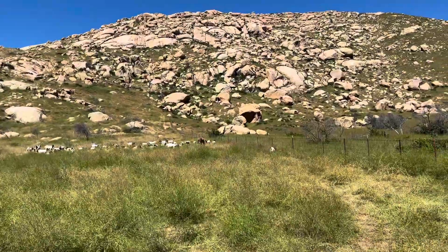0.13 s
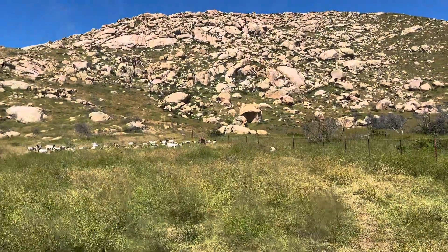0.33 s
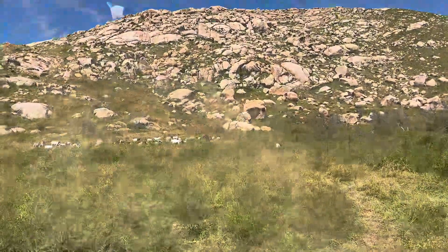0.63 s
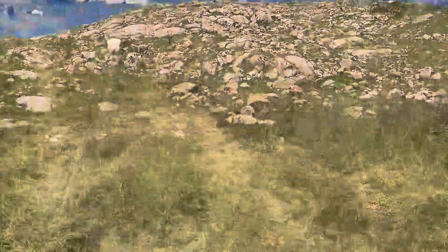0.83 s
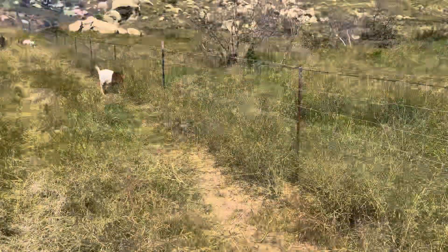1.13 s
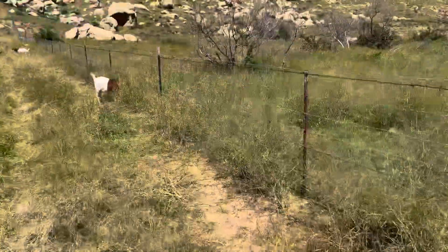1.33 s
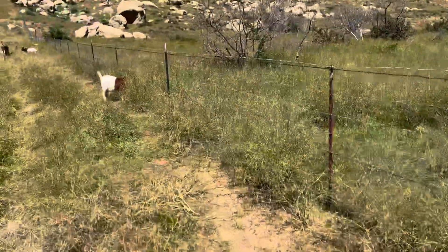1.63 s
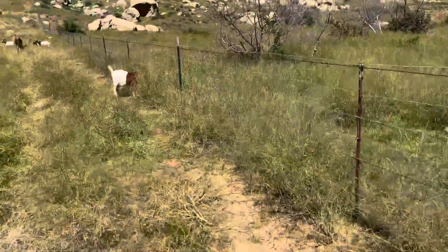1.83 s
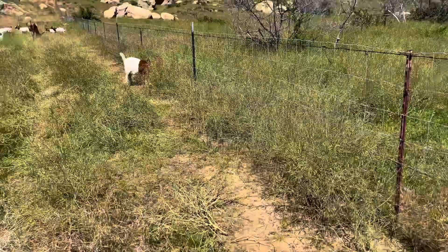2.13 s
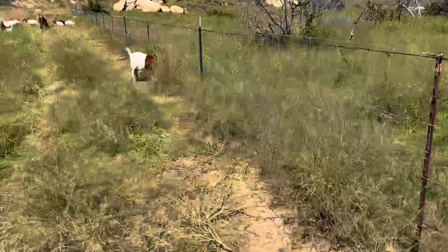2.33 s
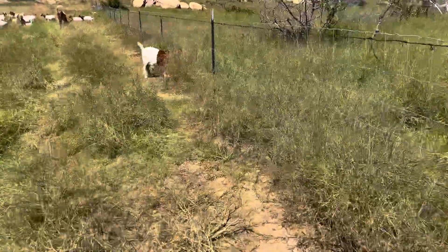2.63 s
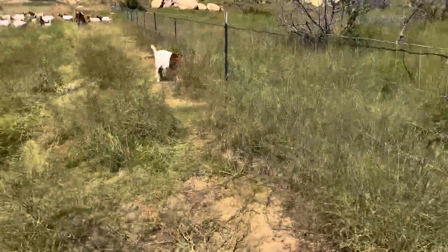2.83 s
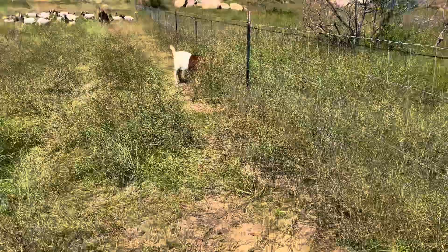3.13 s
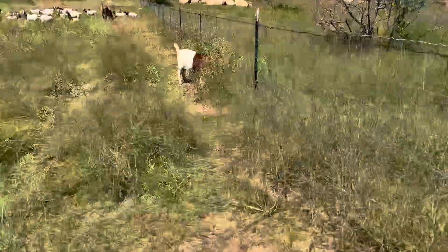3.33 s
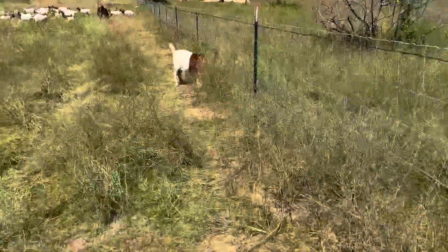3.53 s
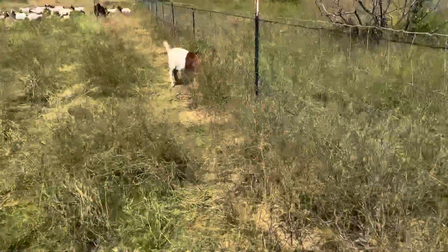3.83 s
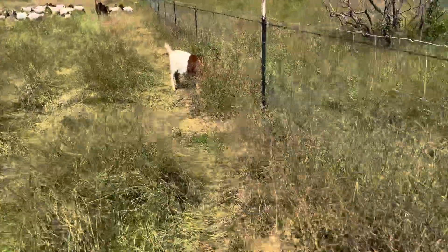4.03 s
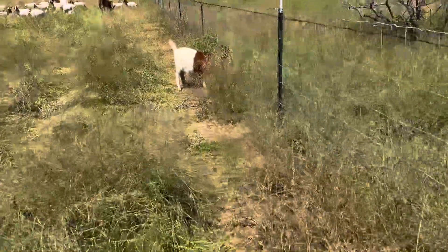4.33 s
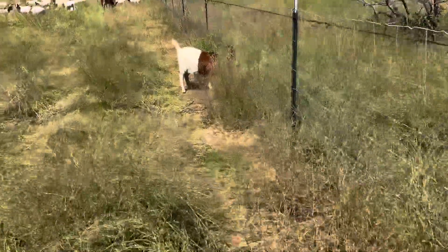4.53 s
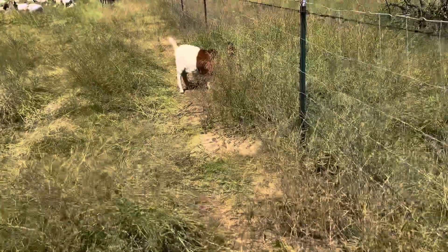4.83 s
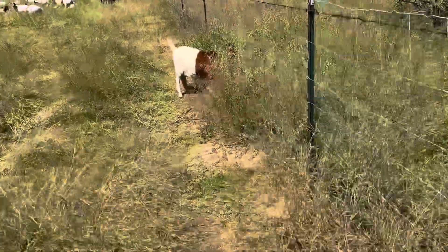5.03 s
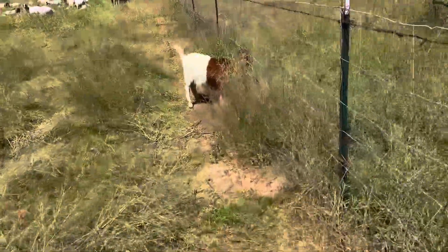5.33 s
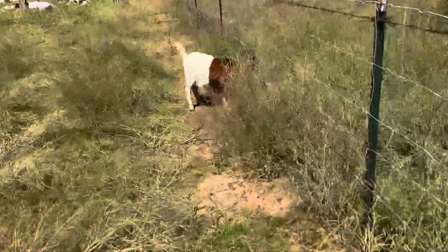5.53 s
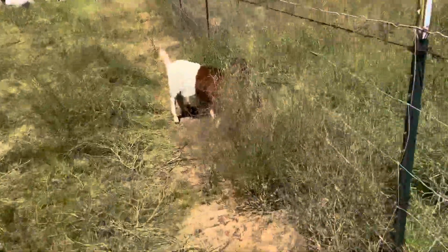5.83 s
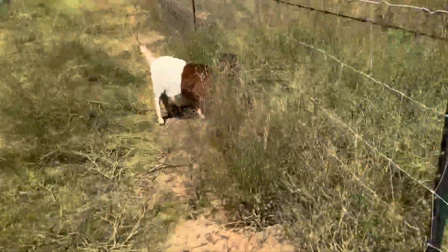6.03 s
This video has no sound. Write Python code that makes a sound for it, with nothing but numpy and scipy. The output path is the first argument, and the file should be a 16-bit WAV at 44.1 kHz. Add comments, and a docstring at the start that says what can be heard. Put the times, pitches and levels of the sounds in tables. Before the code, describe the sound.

A young goat gives one quavering bleat in gusty wind, followed by light steps rustling through dry grass.

```python
"""Wind buffets the two microphone ports of a hand-held camera, and a young goat bleats once across the pasture;
from about 1.2 s someone walks through dry grass, over a faint steady hiss. The bleat is a throbbing train of
vocal-fold pulses, filtered by the resonances of throat and mouth. Each stride scrapes the stalks and snaps a
few, and twigs crunch underfoot near the end. Turbulent pressure at the ports makes the rumble, flutter and
thuds of the wind."""
import sys
import numpy as np
from scipy import signal
from scipy.fft import rfft, irfft
from scipy.io import wavfile
from scipy.ndimage import uniform_filter1d, map_coordinates

SR = 44100
rng = np.random.default_rng(int(sys.argv[2]) if len(sys.argv) > 2 else 0)


def wav_record(signal):
    """Record a signal, one row per channel, as 16-bit PCM in the file named by sys.argv[1]."""
    frames = np.transpose(np.atleast_2d(signal))
    bounded = np.clip(frames, -1, 1)
    # unit amplitude maps onto the largest positive 16-bit level
    quanta = np.round(bounded * 32767).astype(np.int16)
    wavfile.write(sys.argv[1], SR, quanta)


N = 272449
T, HZ = np.arange(N) / SR, np.fft.rfftfreq(N, 1 / SR)

# Phase lead of the bleat at the left port (frequency [Hz], phase [rad])
GOAT_LEAD = [(400, 0), (1900, 2.2), (2760, 6.2), (4800, 7.3), (6000, 6.2), (8900, 6.1), (11600, 0)]
def goat():
    """Source-filter principle: the folds drive the vocal tract, and the call reflects off the land."""
    t = T[:round(1.3 * SR)]
    pulses, effort_db = vocal_folds(t)
    call = np.zeros(N)
    add(call, 0, 2.7 * vocal_tract(t, pulses, effort_db) * gain_of(uniform_filter1d(effort_db, 200)))
    left_db = [(1300, .83), (2400, 4.9), (4400, 5.7), (8000, 4.8), (15000, .5)]
    return ports(reflections(call), GOAT_LEAD, left_db)


# Throbs of the bleat (trough time [s], trough pitch [Hz], trough effort [dB],
# crest time [s], crest pitch [Hz], crest effort [dB], rebound pitch [Hz])
THROBS = [(.323, 408, -64, .35, 409, -55, 388), (.38, 385, -59, .434, 408, -46, 387),
          (.46, 386, -54, .512, 412, -40, 392), (.54, 390, -47, .594, 413, -38, 394),
          (.624, 391, -48, .682, 410, -34, 394), (.708, 391, -43, .76, 410, -33.5, 396),
          (.79, 392, -47, .846, 407, -34, 392), (.872, 392, -44, .932, 410, -32, 398),
          (.968, 386, -46, 1.016, 407, -30.5, 400), (1.058, 376, -53, 1.106, 409, -31.5, 398),
          (1.147, 370, -53, 1.192, 391, -43, 366)]
END_S, END_HZ, END_DB, BREAK_HZ = 1.225, 365, -64, 392
def vocal_folds(t):
    """Glottal pulses: pitch and effort climb in each throb, break, and sag into the next."""
    low_s, low_hz, low_db, crest_s, crest_hz, crest_db, rebound_hz = np.transpose(THROBS)
    # after each crest the folds lose tension: a quick dip, then a short rebound
    times = np.ravel([low_s, crest_s - .018, crest_s, crest_s + .012, crest_s + .022], "F")
    pitches = np.ravel([low_hz, crest_hz - 2, crest_hz, np.minimum(BREAK_HZ, rebound_hz), rebound_hz], "F")
    hz = np.interp(t, [*times, END_S], [*pitches, END_HZ])
    times = np.ravel([low_s, crest_s - .022, crest_s + .009], "F")
    efforts = np.ravel([low_db, crest_db - 1, crest_db], "F")
    effort_db = np.interp(t, [*times, END_S], [*efforts, END_DB], left=-120, right=-120)
    jitter = 1 + .005 * wobble(200)[:len(t)]
    cycles = np.cumsum(uniform_filter1d(hz, 170) * jitter) / SR
    tone = unit_rms(sum(np.cos(2 * np.pi * k * cycles) / (1 + (k / 15) ** 3) for k in range(1, 32)))
    breath = unit_rms((.9 + np.exp(-(cycles % 1) / .096)) * rng.standard_normal(len(t)))
    rough = .2 + .4 * sum(np.exp(-((t - s - .016) / .007) ** 2) for s in crest_s)
    return (1 - rough) * tone + rough * breath, effort_db


# Formant groups (frequency before shifting [Hz], bandwidth [Hz], relative gain [dB])
MAIN = [(2890, 1400, -6), (3230, 580, 4.5), (10530, 510, -7)]
LOW = [(1560, 250, -10), (2034, 420, 4.5)]
TOP = [(6430, 760, 1.5), (7080, 1180, 6), (8270, 2300, 2.5)]
# Upper formants (offset from their gliding base [Hz], bandwidth [Hz], relative gain [dB])
UPPER = [(60, 1080, 8.4), (675, 930, 1.1)]
# Vowel colour against the main group (time [s], low [dB], upper [dB], top [dB])
VOWEL = [(.345, 1.5, -9, -10.5), (.507, 5, -6, -9), (.6, -10, -7, -6), (.675, -17, -15.5, -18),
         (.76, -11, -16, -18), (.84, -7.5, -11.5, -16), (.92, -7, -10.5, -15), (1.01, -14, -7, -7),
         (1.1, -10, -7.5, -4.5), (1.2, -24, -2, 0.5)]
def vocal_tract(t, pulses, effort_db):
    """Formant filtering: gliding resonances of throat and mouth shape the vowel."""
    vowel_s, *vowel_db = np.transpose(VOWEL)
    dip_db = uniform_filter1d(np.maximum(effort_db, END_DB), round(.09 * SR)) - effort_db
    # the upper and top groups smooth over a share of the throbbing
    low, upper, top = (gain_of(np.interp(t, vowel_s, db) + share * np.minimum(dip_db, 12))
                       for db, share in zip(vowel_db, [0, .41, .58]))
    groups = [(MAIN, 1, -2800 * np.maximum(t - 1.084, 0)),  # sinks as the call dies
              (LOW, low, 0),
              (UPPER, upper, 4430 - 940 * (t - THROBS[0][3])),  # sinks as the mouth opens
              (TOP, top, -730 * (t - .9))]
    return sum(gain * gain_of(db) * resonate(pulses, hz + shift_hz, width)
               for formants, gain, shift_hz in groups for hz, width, db in formants)


# Lag of the ground echo as the head moves (time [s], delay [ms])
GROUND_ECHO = [(.35, .4), (.5, .42), (.6, .428), (.76, .41), (.9, .424), (1.0, .44), (1.12, .447),
               (1.2, .47)]
def reflections(call):
    """Comb filtering by a dull ground echo; scattering by grass and rocky slope adds a short tail."""
    delay = np.interp(T, *np.transpose(GROUND_ECHO)) * SR / 1000
    call = call + gain_of(-4) * map_coordinates(uniform_filter1d(call, size=4), [np.arange(N) - delay])
    tail = rng.standard_normal((2, 6000)) * gain_of(-60 * T[:6000] / .08)
    tail /= np.linalg.norm(tail[0])
    return call + gain_of(-11) * signal.oaconvolve(call[None], tail, axes=1)[:, :N]


# Legs sweeping the grass (entry time [s], exit time [s], entry swish [dB], exit swish [dB],
# rustle against swish [dB])
STRIDES = [(1.23, 1.392, -54, -45.5, -5.5), (1.433, 1.53, -62, -66, -4), (1.724, 1.759, -62.5, -54.5, -5),
           (1.89, 2.117, -45.5, -58.5, -16.5), (2.18, 2.337, -63, -67.5, 4),
           (2.434, 2.719, -45, -52.5, -5.5), (2.983, 3.452, -49, -60, -5), (3.616, 3.854, -44, -52, -8),
           (4.169, 4.437, -44, -56.5, -12), (4.583, 5.024, -54, -72, -6), (5.351, 5.578, -50.5, -53, -8.5),
           (5.76, 5.796, -53, -59, -3), (5.86, 6.033, -53.5, -53, -1), (6.08, 6.183, -62, -71.5, 4)]
RISE_DB_PER_S, DROP_DB, DROP_S, SETTLE_DB_PER_S = 172, 9, .014, 116
def stride_powers():
    """Incoherent sources add in power: each leg pushes in, drags, pulls out, and the stalks settle."""
    swish, rustle = np.zeros((2, N))
    for enter, leave, enter_db, leave_db, rustle_db in STRIDES:
        before, after = np.maximum(enter - T, 0), np.maximum(T - leave, 0)
        db = np.interp(T, [enter, leave], [enter_db, leave_db]) - RISE_DB_PER_S * before
        db -= DROP_DB * np.minimum(after / DROP_S, 1) + SETTLE_DB_PER_S * after
        peak_db = max(enter_db, leave_db)
        swish += gain_of(db) ** 2
        rustle += gain_of(peak_db + rustle_db + .61 * (db - peak_db)) ** 2
    return swish, rustle


# Spectra of fine and coarse scrapes (frequency [Hz], relative level [dB])
SWISH = [(2500, -13), (5500, -9), (7500, -5.5), (9000, 1), (10300, 2), (11500, -2), (12700, -14),
         (13600, -27), (15500, -21)]
RUSTLE = [(300, -22), (900, 5), (1700, 2.5), (2900, 0), (4300, -9), (6000, -6.5), (9000, -3), (13000, -62)]
# Likeness of the two ports (frequency [Hz], correlation [0-1])
GRASS_CORRELATION = [(800, 1), (2000, 0.59), (4000, 0.31), (8000, 0.8), (15000, 1)]
# Phase lead of the left port (frequency [Hz], phase [rad])
GRASS_LEAD = [(300, 0), (1900, 1.1), (6600, .5), (7750, 1.1), (8870, -.4), (11700, -6), (14600, -12.6)]
# Left port against right (frequency [Hz], level difference [dB])
GRASS_LEFT = [(700, 16.5), (1300, 9), (2400, 5), (4400, 8), (8100, 3), (15000, -2.5)]
def grass():
    """Friction noise: thousands of tiny, uneven stalk scrapes follow the legs, with a few snaps."""
    swish, rustle = stride_powers()
    out = np.zeros((2, N))
    for spectrum, power, db, per_s, spread_db, patch_db in [(SWISH, swish, 4.5, 9000, 3.5, 1.5),
                                                            (RUSTLE, rustle, 4, 5000, 3, 3.5)]:
        scrapes = (impulses(per_s, spread_db, cap=6) + .6) * rng.standard_normal((2, N))
        envelope = np.sqrt(power) * gain_of(db + 1.6 * wobble(74))
        out += envelope * patchy(coloured(pair(scrapes, GRASS_CORRELATION), spectrum), patch_db)
    return ports(out + snaps(), GRASS_LEAD, GRASS_LEFT)


# Breaking stalks (time [s], relative peak level [dB], frequency [Hz])
SNAPS = [(0.201, -49, 8900), (0.967, -27, 9000), (0.981, -35, 10000), (1.52, -37.5, 6640),
         (1.688, -40, 1800), (1.85, -42, 11100), (1.856, -29, 9200), (2.0785, -28, 9600),
         (2.385, -39, 1300), (2.419, -34, 8960), (2.439, -35, 8060), (2.6268, -36, 1120),
         (2.6675, -27, 11600), (2.673, -29, 8700), (2.712, -22, 10500), (2.937, -44, 1690),
         (3.125, -22, 9600), (3.132, -48, 4000), (3.3083, -39, 1170), (3.497, -41, 3230),
         (3.7336, -22, 9000), (3.842, -31, 7700), (4.069, -29, 9100), (4.0995, -28, 8800),
         (4.195, -44, 8900), (4.864, -35, 8350), (4.9425, -46, 8750), (4.9687, -44, 9300),
         (5.084, -54, 2000), (5.2525, -45, 9400), (5.265, -46, 2780), (5.2913, -42, 1090),
         (5.7357, -46, 2800), (5.8245, -43, 1300), (6.059, -42, 4200)]
def snaps():
    """Brittle fracture: a stalk gives a heavily damped ring and a tick of noise."""
    out, t = np.zeros(N), T[:200]
    for s, db, hz in SNAPS:
        ring = np.sin(2 * np.pi * hz * t) * t * hz * np.exp(-t * hz / .8)
        snap = ring + .15 * rng.standard_normal(len(t)) * np.exp(-t / .0008)
        add(out, s, gain_of(db + 2.5) * snap / abs(snap).max())
    return out


# Twigs crushed underfoot (time [s], duration [s], level before filtering [dB])
CRUNCHES = [(5.774, 0.0048, -38.5), (5.987, 0.0124, -42), (6.02, 0.014, -41)]
# Spectrum of a crack (frequency [Hz], relative level [dB])
TWIG = [(500, -9), (1200, -2.5), (2800, 2.5), (4200, -10.5), (9000, -29)]
def twigs():
    """Repeated fracture: each crunch is a clump of broadband cracks."""
    cracks = np.zeros(N)
    for s, duration, db in CRUNCHES:
        noise, chance = rng.standard_normal((2, 1200))
        clumps = uniform_filter1d(chance, size=30) ** 2
        add(cracks, s, gain_of(db) * unit_rms((noise * clumps)[:round(duration * SR)]))
    cracks = irfft(rfft(cracks) * gain_of(6 + curve(TWIG)), N)
    return ports(cracks[None], GRASS_LEAD, [(1000, 4.5), (9000, 1.5)])


# Wind strength (time [s], relative rumble level [dB], flutter against rumble [dB])
WIND = [(0.0, -17, -8), (0.05, -24, -4.5), (0.09, -14.5, -5), (0.19, -21, 1.5), (0.34, -29.5, -12.5),
        (0.38, -23.5, -9.5), (0.6, -24, -6), (0.92, -26, -6), (1.02, -22, -6), (1.055, -32, -8),
        (1.1, -28.5, 0.5), (1.2, -25, -3), (1.24, -22, -8.5), (1.32, -31.5, -10.5), (1.47, -40.5, -12.5),
        (1.53, -28, -5.5), (1.76, -33, -10), (1.96, -28, -12.5), (2.01, -35.5, -7), (2.05, -27, -18),
        (2.17, -45.5, -11), (2.27, -27, -11), (2.67, -47.5, -11.5), (2.72, -33.5, -13),
        (3.18, -29.5, -13.5), (3.35, -47.5, -8.5), (3.54, -25, -9), (3.66, -28.5, 0), (3.68, -19, -8.5),
        (3.9, -26.5, -17.5), (3.96, -36.5, -11.5), (4.25, -23.5, -3.5), (4.65, -33.5, -9.5),
        (4.731, -21.5, -7), (4.84, -28, -8), (5.02, -40, -20.5), (5.15, -59, -17), (5.21, -27, -9),
        (5.26, -33.5, -23.5), (5.33, -47.5, -1), (5.42, -25, -8), (5.51, -41, -28), (5.54, -59, -5),
        (5.59, -30.5, -15), (5.67, -39, -10), (5.71, -27, -12), (5.76, -37, -12), (5.9, -42, -12),
        (5.94, -36, -15), (6.01, -54, -10), (6.07, -36, -15), (6.12, -52, -14), (6.15, -43, -18),
        (6.18, -64, -7)]
# Rasp of the strong early gusts (time [s], relative level [dB])
RASP_LEVEL = [(0.0, -19), (0.012, -19), (0.045, -32), (0.075, -25), (0.15, -20), (0.165, -33), (0.23, -49),
              (0.378, -41), (0.39, -57), (0.452, -28.5), (0.488, -54), (0.544, -19), (0.626, -32.5),
              (1.122, -35.5), (1.186, -24.5), (1.206, -48), (1.45, -72)]
# Spectra of the three wind bands (frequency [Hz], relative level [dB])
RUMBLE = [(28, -43), (55, 5.5), (100, 3), (200, -3.5), (300, -13), (600, -84)]
FLUTTER = [(120, -37), (250, 0), (400, -3), (800, -12.5), (1300, -36.5), (3000, -94)]
RASP = [(500, -0.5), (1000, 1.5), (2000, -13), (4000, -35), (8000, -62), (11000, -98)]
def wind():
    """Turbulent pressure at the ports: lumpy rumble, bursts of flutter, and rasp in strong gusts."""
    s, rumble_db, flutter_db = np.transpose(WIND)
    rasp_db = np.interp(T, *np.transpose(RASP_LEVEL), right=-90)
    gust, burst = wobble(23), wobble(135)
    bands = [(RUMBLE, np.interp(T, s, rumble_db) + 1.3, 2.94 * gust + 1.72 * burst, .74),
             (FLUTTER, np.interp(T, s, rumble_db + flutter_db) - .5, 4.3 * (gust + burst), .64),
             (RASP, rasp_db, .63 * gust + 2.7 * burst, .3)]
    out = np.zeros((2, N))
    for spectrum, db, lumps_db, correlation in bands:
        noise = pair(rng.standard_normal((2, N)), [(20, correlation), (9000, correlation)])
        out += gain_of(db) * unit_rms(gain_of(lumps_db)) * coloured(noise, spectrum)
    return gain_of([[.4], [-.4]]) * out


# Eddies breaking on the ports (time [s], relative peak level [dB], nominal frequency [Hz],
# harsh edge against thud [dB])
EDDIES = [(0.093, -7, 370, -11), (0.117, -24.5, 420, 3), (0.135, -10.5, 320, -15), (0.158, -23, 495, -19),
          (0.183, -27, 430, -39), (0.324, -25, 480, -4), (0.373, -14.5, 415, -12), (0.454, -8, 440, -29),
          (0.546, -15, 408, -14), (0.623, -17, 450, -22), (0.759, -14, 550, -2), (0.802, -20.5, 426, -2),
          (0.887, -13, 473, -11), (0.984, -15, 520, -18), (1.012, -12, 462, -10.5), (1.08, -22, 371.4, -21),
          (1.13, -13.5, 591, -12), (1.152, -11.5, 599, -24), (1.176, -15, 720, -20), (1.186, -19, 609, -2),
          (1.248, -22, 425, -23), (1.51, -18.5, 504, -36), (1.642, -33, 423, -37), (1.674, -14.5, 352, -51),
          (1.826, -16, 341, -18.5), (1.943, -14.5, 387, -50), (1.969, -22, 554, -28),
          (2.256, -26, 370, -35), (2.845, -20, 322, -40), (2.894, -25, 343, -18), (3.032, -21, 332, -37),
          (3.447, -19.5, 329, -42), (3.686, -19.5, 318, -39), (3.708, -11, 513, -40),
          (3.726, -9.5, 424, -20), (3.746, -12, 376, -15), (3.812, -8.5, 346, -44),
          (3.875, -10.5, 584, -15), (3.942, -21, 340, -39), (4.005, -21.5, 370, -51),
          (4.134, -15.5, 354, -61), (4.215, -18, 445, -16), (4.232, -16, 400, -40), (4.252, -30, 504, 0),
          (4.314, -29, 552, -13), (4.326, -11.5, 595, -18), (4.344, -31, 507, -20), (4.372, -33, 480, -22),
          (4.474, -17, 374, -26), (4.709, -18.5, 510, -33), (4.741, -16, 368, -44),
          (4.779, -14.5, 350, -42), (4.83, -26.5, 393, -40), (4.893, -31.5, 580, -40),
          (5.162, -20.5, 359, -36), (5.199, -21.5, 430, -47), (5.598, -23, 407, -40), (5.7, -13, 370, -42)]
EDDY_DECAY_S, EDDY_GLIDE_S = .0031, .0094
def eddies():
    """Pressure transients: each passing eddy is a ragged, falling thud with a harsh edge."""
    out, t = np.zeros((2, N)), T[:2000]
    harsh = np.array([coloured(rng.standard_normal(N), RASP) for port in "LR"])
    envelope = t ** 2 * np.exp(-t / EDDY_DECAY_S)
    for s, db, hz, edge_db in EDDIES:
        common, *sides = rng.standard_normal((3, len(t)))
        glide = eddy_glide(hz, t)
        swing = np.sin(2 * np.pi * np.cumsum(glide) / SR + common[0])
        ragged = np.array([unit_rms(resonate(common + .85 * own, glide, .73 * hz)) for own in sides])
        thud = (swing + .5 * ragged) * envelope
        edge = harsh[:, round(s * SR):][:, :len(t)] * (envelope / envelope.max()) ** 3
        add(out, s - .005, gain_of(db - 3.5) * (thud / abs(thud[0]).max() + gain_of(edge_db + 1.5) * edge))
    return out


def eddy_glide(hz, t):
    """Exponential glide: the pressure swing slows as an eddy passes."""
    return hz * (.3 + 1.333 * np.exp(-t / EDDY_GLIDE_S))


def small_eddies():
    """Shot noise: a dense random run of small falling thuds follows the wind strength."""
    out, t = np.zeros((2, N)), T[:2500]
    envelope = t ** 2 * np.exp(-t / EDDY_DECAY_S)
    arrivals = impulses(per_s=45, spread_db=5, cap=4)
    kind = rng.integers(0, 12, N)
    for k, hz in enumerate(np.geomspace(230, 520, num=12)):
        common, *sides = rng.standard_normal((3, len(t)))
        ragged = np.array([resonate(common + .9 * own, eddy_glide(hz, t), .44 * hz) for own in sides])
        out += signal.oaconvolve((arrivals * (kind == k))[None], unit_rms(ragged * envelope), axes=1)[:, :N]
    s, rumble_db, flutter_db = np.transpose(WIND)
    return gain_of(np.interp(T, s, rumble_db + .63 * flutter_db) - 1.5) * unit_rms(out)


# Spectrum of the open pasture (frequency [Hz], relative level [dB])
PASTURE = [(300, -14), (1200, 18), (2200, 8), (3200, -1), (6000, -2), (8500, 1.5), (9700, 11), (10400, -27),
           (12000, -47)]
def pasture():
    """Ambient noise floor: a faint, nearly steady hiss."""
    hiss = coloured(pair(rng.standard_normal((2, N)), GRASS_CORRELATION), PASTURE)
    return gain_of(-66.5 + 1.2 * wobble(15)) * ports(hiss, GRASS_LEAD, [(100, .5), (9000, .5)])


def gain_of(db):
    """Decibels to amplitude ratio."""
    return 10 ** (np.asarray(db) / 20)


def unit_rms(x):
    """Normalisation to rms 1."""
    return x / np.sqrt(np.mean(x ** 2) + 1e-20)


def curve(points):
    """Interpolation of a table over log frequency."""
    hz, value = np.transpose(points)
    return np.interp(np.log(HZ + 1), np.log(hz + 1), value)


def coloured(x, spectrum):
    """Spectral shaping, at rms 1."""
    return unit_rms(irfft(rfft(x) * gain_of(curve(spectrum)), N))


def wobble(hz):
    """Low-pass noise: a random drift of rms 1, up to about hz."""
    return coloured(rng.standard_normal(N), [(hz / 8, -1), (hz, -6), (hz * 2, -40), (hz * 4, -90)])


def impulses(per_s, spread_db, cap):
    """Poisson arrivals of uneven size, spanning cap times spread_db."""
    return gain_of(spread_db * np.minimum(rng.exponential(1, N), cap)) * (rng.random(N) < per_s / SR)


def patchy(x, depth_db):
    """Spectral modulation: random louder and softer patches, about 800 Hz by 50 ms."""
    z = signal.stft(x, nperseg=512, noverlap=384)[2]
    patches = rng.standard_normal(z.shape[:0:-1]).T
    patches = uniform_filter1d(uniform_filter1d(patches, size=9, axis=0), size=18, axis=1)
    z *= gain_of(depth_db * unit_rms(patches))
    return unit_rms(signal.istft(z, nperseg=512, noverlap=384)[1][:, :N])


def add(mix, s, sound):
    """Superposition of a sound at time s."""
    part = mix[..., round(s * SR):][..., :sound.shape[-1]]
    part += sound[..., :part.shape[-1]]


def resonate(x, hz, width):
    """Heterodyne resonance of gain 1: shift hz down to zero, smooth twice, shift back."""
    carrier = np.exp(2j * np.pi * np.cumsum(hz * np.ones(len(x))) / SR)
    r = np.exp(-np.pi * width / SR)
    return 2 * (carrier * signal.lfilter([(1 - r) ** 2], [1, -2 * r, r * r], x / carrier)).real


def pair(noises, correlation):
    """Partial coherence: two independent noises mix into two partly alike ones."""
    z, alike = rfft(noises), np.clip(curve(correlation), 0, 1)
    return irfft(np.array([z[0], alike * z[0] + np.sqrt(1 - alike ** 2) * z[1]]), N)


def ports(x, lead, left_db):
    """Stereo cues: the two ports differ in phase and level."""
    z, tilt = rfft(x), gain_of(curve(left_db) / 2)
    return irfft(np.array([z[0] * tilt, z[-1] / tilt * np.exp(-1j * curve(lead))]), N)


def scene():
    """Superposition of all sources at the ports."""
    return goat() + wind() + eddies() + small_eddies() + grass() + twigs() + pasture()


def record(dry):
    """Band limiting: a steep low-pass at 15850 Hz."""
    return signal.oaconvolve(dry, signal.firwin(511, 15850, window=("kaiser", 9), fs=SR)[None], "same")


dry = scene()
out = record(dry)
wav_record(out)
```